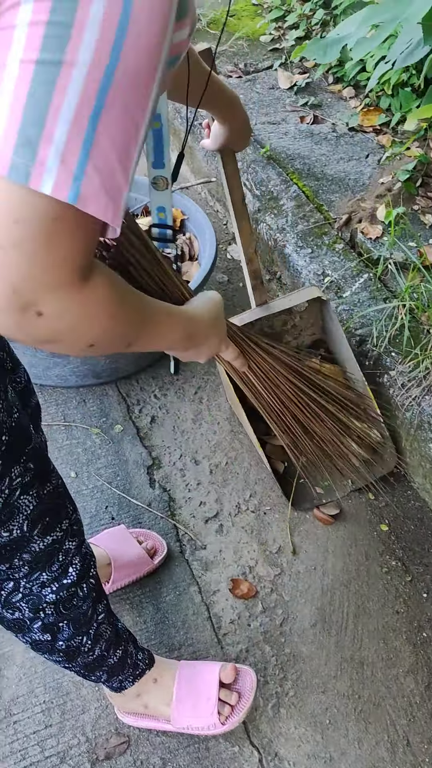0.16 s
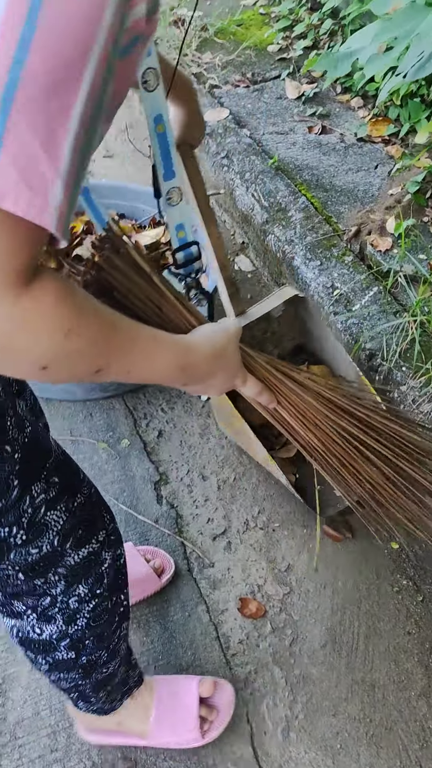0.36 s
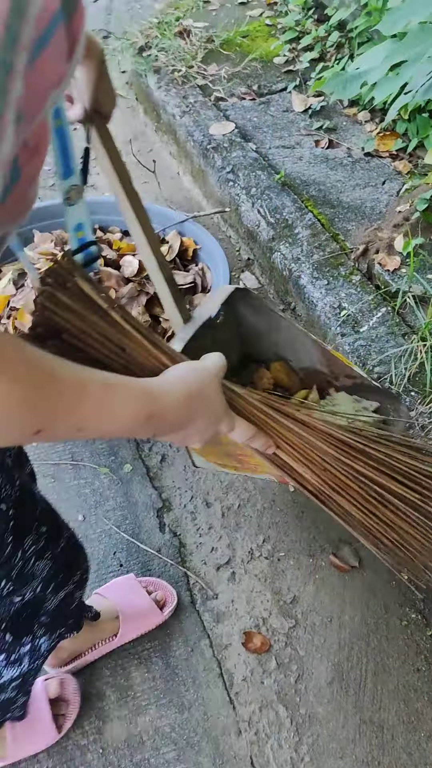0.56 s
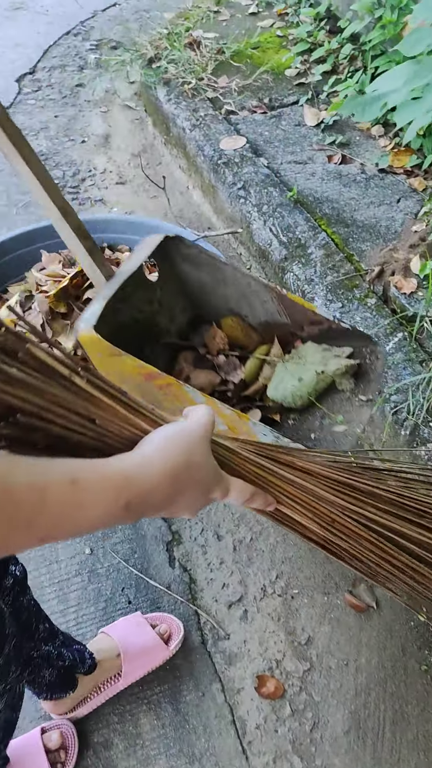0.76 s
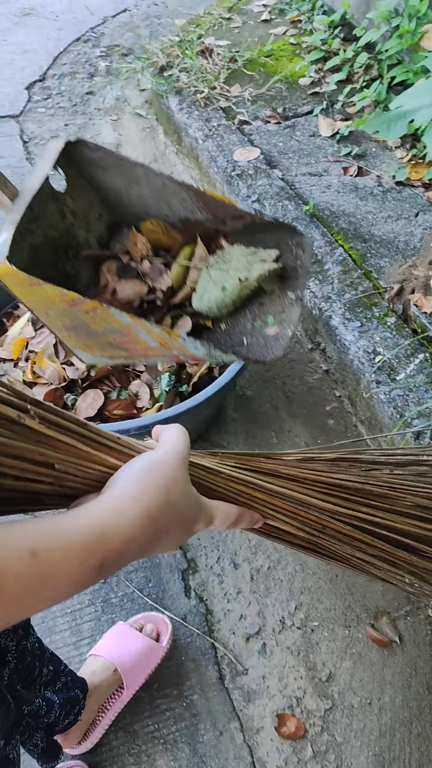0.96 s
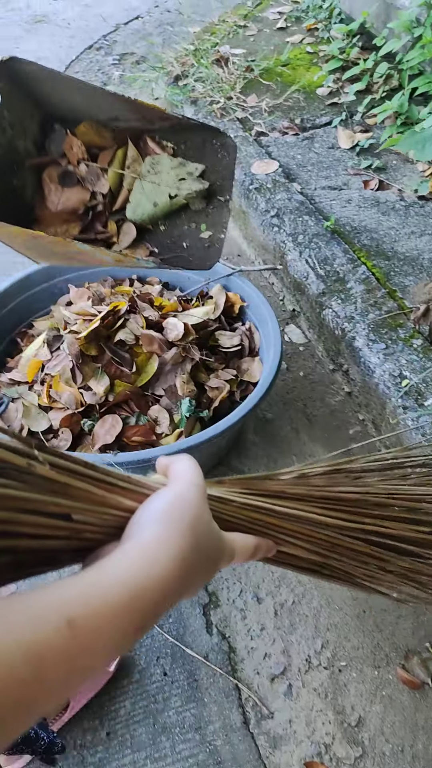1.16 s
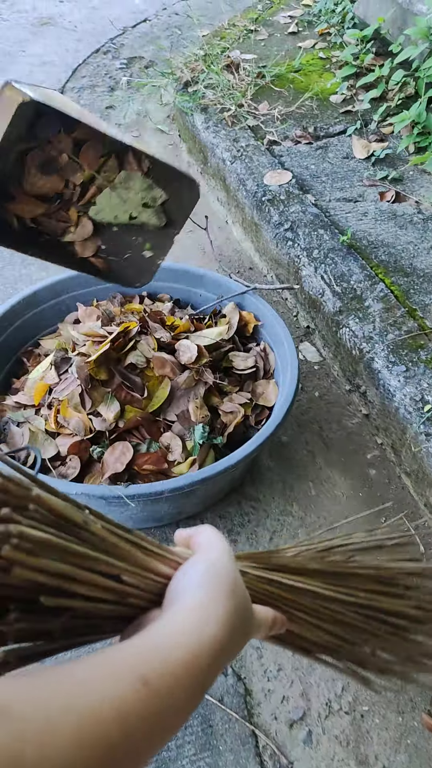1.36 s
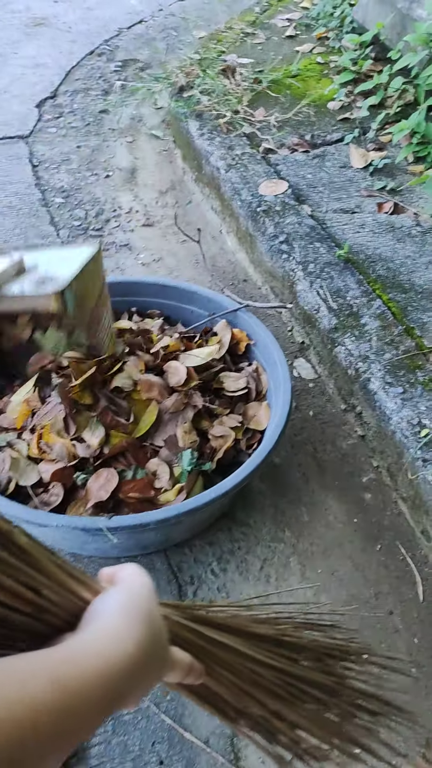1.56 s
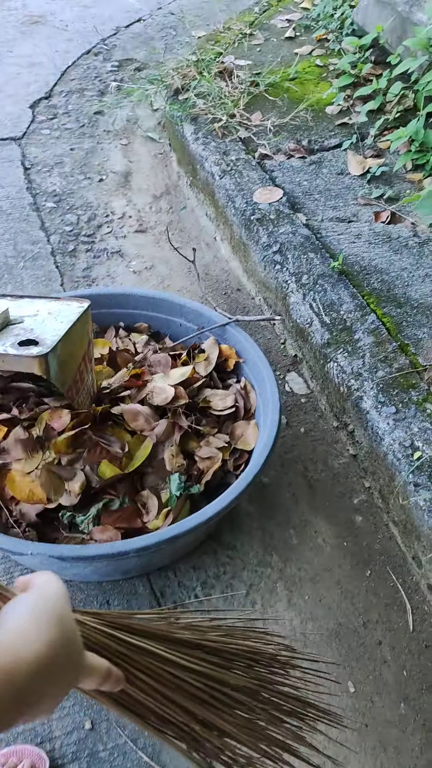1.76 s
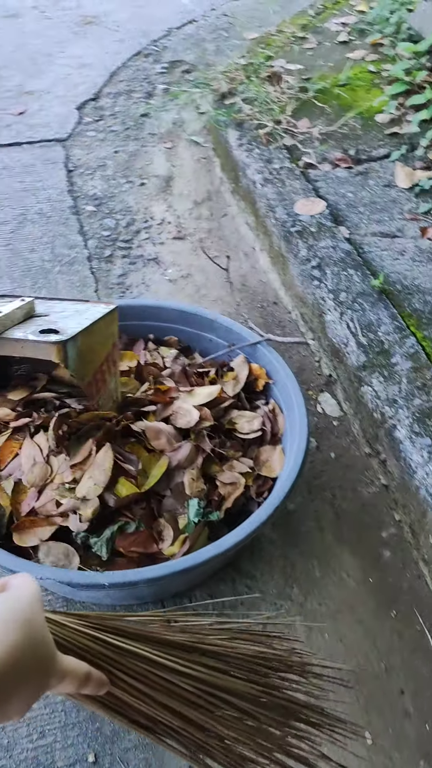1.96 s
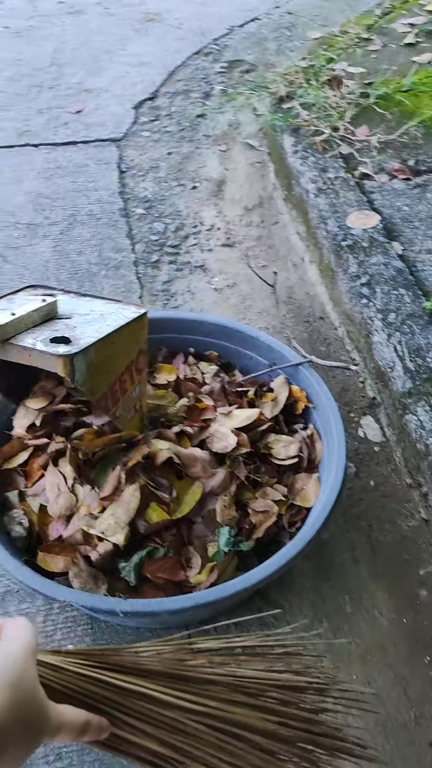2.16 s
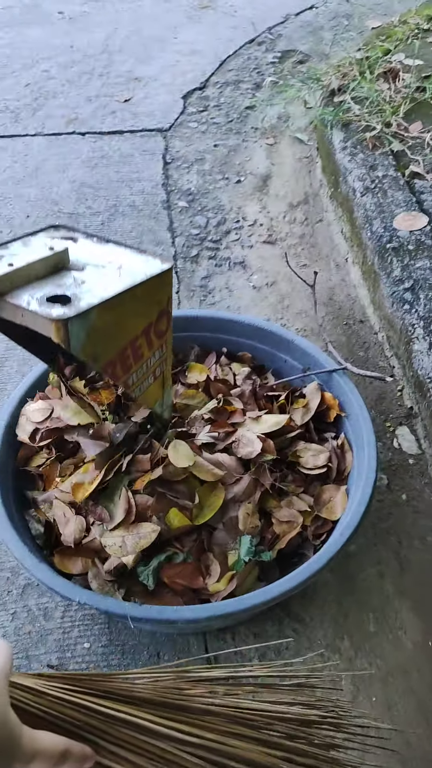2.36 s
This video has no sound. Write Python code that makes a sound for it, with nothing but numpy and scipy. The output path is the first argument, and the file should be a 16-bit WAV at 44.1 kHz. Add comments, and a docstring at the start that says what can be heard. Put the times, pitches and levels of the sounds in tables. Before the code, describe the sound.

A close dustpan thumps at about 0.25 seconds during a soft broom stroke, then gives a loud, briefly ringing clack at 0.35. Dry leaves tick inside and slide around 1.25. From 1.6 to 2 seconds they pour out, crackling and scraping, then the pan bumps a plastic basin and the leaves settle. Faint insects shrill over a low outdoor rumble throughout; a distant bird chirps near 0.9 and 1.3.

```python
"""A long-handled dustpan, close to the microphone on a concrete garden path, takes dry leaves from a
stick broom. It thumps, then clacks as it is lifted, each blow ringing its body. The leaves slide in
the pan and pour into a plastic basin in a crackle of tiny snaps; the pan bumps down on the basin.
Further off, insects shrill steadily in the plants and a far bird chirps twice over a low outdoor
rumble. In stereo, with the treble of the near sounds leaning to the right."""
import sys
import numpy as np
from scipy import signal
from scipy.fft import rfft, irfft
from scipy.io import wavfile
from scipy.ndimage import uniform_filter1d

SR = 44100
rng = np.random.default_rng(int(sys.argv[2]) if len(sys.argv) > 2 else 0)


def bounce(signal):
    """Save signal as a 16-bit WAV file at the path given by the first command-line argument."""
    frames = np.transpose(np.atleast_2d(signal))
    limited = np.clip(frames, -1, 1)
    pcm = np.round(limited * 32767).astype(np.int16)
    wavfile.write(sys.argv[1], SR, pcm)


N = 105840
BLOW_SAMPLES = 12288
T = np.arange(N) / SR
HZ = np.maximum(np.fft.rfftfreq(N, 1 / SR), 1)

# Blows and taps: start_s, level_db, brightness_hz
BROOM_THUMPS = [(0.2408, -18, 800), (0.2499, -22, 1200), (0.2585, -22, 1900), (0.2752, -25, 600),
                (0.2838, -30, 1400)]
HANDLE_CLACKS = [(0.3499, -9, 3400), (0.3566, -17, 2100), (0.3587, -15, 900)]
TWIG_TUMBLES = [(1.224, -38, 2500), (1.2525, -38, 2000), (1.268, -29, 3000), (1.279, -32, 3000),
                (1.314, -40, 2000)]
BASIN_BUMPS = [(2.034, -29, 1600), (2.041, -16.5, 950), (2.049, -18, 1250), (2.066, -26, 1200),
               (2.094, -29, 500), (2.111, -31, 400), (2.138, -28, 400), (2.168, -25, 450), (2.19, -32, 800),
               (2.217, -33, 500), (2.272, -38, 600)]
STALK_TICKS = [(0.069, -42, 12000), (0.430, -37, 4000), (0.5092, -32.5, 6000), (0.5258, -29.5, 3600),
               (1.015, -41, 4000), (1.224, -38.5, 7000), (1.388, -38, 3000), (2.088, -33, 11000)]
# Ringing modes of the pan and the basin: pitch_hz, gain_db, t60_s
PAN_FLOOR_MODES = [(152, -6, .07), (246, 3, .055), (333, -3, .04), (373, -10, .17), (439, -13, .13),
                   (533, -6, .07), (731, -13, .2), (932, -16, .05), (1849, -19, .07)]
PAN_WALL_MODES = [(205, -19, .3), (302, -18, .2), (367, -2, .09), (404, -4, .155), (498, -13, .21),
                  (626, -9, .14), (837, -6, .12), (936, -17, .16), (1011, -8, .07), (1163, -14, .13),
                  (1248, -19, .18), (1339, -11, .09), (1906, -8, .06), (2057, -13, .11), (2127, -9, .09),
                  (2321, 7, .008), (2466, -2, .06), (3202, -14, .04)]
PAN_BACK_MODES = [(1020, -3, .1), (1255, 0, .09), (1410, -1, .08), (1730, -10, .06), (2950, -6, .05)]
PAN_LIP_MODES = [(1850, -4, .04), (2300, -4, .025), (3050, -2, .03)]
BASIN_MODES = [(107, -20, .18), (190, -14, .1), (243, -2, .12), (283, -9, .09), (362, -10, .12),
               (422, -14, .12), (484, -7, .1), (545, -9, .09), (743, -14, .09), (845, -10, .12),
               (1044, -20, .12), (1233, -17, .12), (2073, -21, .088)]
# Short rubs of bristles, sandal and leaves: start_s, attack_s, hold_s, release_t60_s, level_db
BROOM_STROKE = (0, .004, .07, .8, -44.5)
BROOM_BRUSH = (0.6145, .002, .058, .2, -41.5)
SANDAL_SCUFF = (1.095, .012, .04, .2, -44)
LEAF_SLIDE = (1.25, .023, .033, .2, -35)
LIP_SCRAPE = (1.635, .04, .07, .42, -34)
LEAF_LANDING = (1.79, .04, .02, .25, -40)
LEAF_CRUNCH = (2.034, .008, .055, .12, -52)
LEAF_SETTLING = (1.99, .04, .36, .5, -47.5)
# Rise and fall of the shifting leaves, the pour and the distant air: time_s, gain_db
SHIFT_CURVE = [(0, -56), (0.45, -53), (0.58, -59), (0.82, -64), (1.0, -56), (1.2, -56), (1.45, -60),
               (2.4, -58)]
POUR_CURVE = [(1.55, -59), (1.616, -46), (1.682, -37), (1.77, -43), (1.812, -43), (1.824, -46), (2.0, -58)]
AIR_CURVE = [(0, -44.5), (0.7, -47), (1.4, -47), (2.4, -46)]
# Spectrum of each noisy sound: frequency_hz, gain_db
CLATTER_COLOUR = [(40, -40), (90, -25), (140, -7), (220, -4), (450, 0), (1000, -4.5), (1600, -8),
                  (2450, -.5), (3200, -7), (4200, -26), (8000, -30), (15000, -30)]
TICK_COLOUR = [(300, -16), (800, -11), (1300, -3), (1850, 2), (2400, -3), (3200, 1), (4000, -11),
               (9000, -8), (15000, -11)]
STROKE_COLOUR = [(300, -6), (1200, -6), (2000, 0), (3200, -1), (4200, -6), (8000, -6), (10000, -9),
                 (14000, -10)]
BRUSH_COLOUR = [(400, -10), (1200, -12), (1550, 1), (1800, 4), (2300, -3), (3200, -1), (3900, -15),
                (9000, -14), (14000, -19)]
SCUFF_COLOUR = [(150, -8), (450, 0), (650, -6), (880, -1), (1200, -14), (3000, -20), (9000, -42)]
SHIFT_COLOUR = [(400, -4), (1300, -1), (1900, 2), (3200, -1), (4500, -10), (7000, -12), (9000, -8),
                (12000, -13), (14000, -13)]
SLIDE_COLOUR = [(60, -25), (180, 0), (400, -8), (750, -8), (980, 2), (1150, -4), (1900, -1), (2400, -3),
                (3000, 0), (4000, -7), (9000, -13), (14000, -28)]
POUR_COLOUR = [(60, -10), (190, 3), (400, -1), (800, 0), (1500, -4), (2200, -3), (3000, -4), (3800, -4),
               (5000, -7.5), (8000, -6.5), (11000, -12), (14000, -13.5)]
SCRAPE_COLOUR = [(400, -20), (1550, -14), (1860, 5), (2020, -1), (2260, 3), (2550, 0), (2780, -5),
                 (3000, 3), (3300, -2), (4000, -18), (14000, -35)]
LANDING_COLOUR = [(80, -20), (175, 0), (280, -8), (600, -17), (2000, -35)]
CRUNCH_COLOUR = [(3000, -10), (5000, 0), (9000, 0), (14000, -10)]
SETTLING_COLOUR = [(200, -3), (600, 1), (1400, -2), (2400, 1), (3200, -1), (4200, -8), (6000, -12),
                   (8500, -12), (11000, -16), (14000, -17)]
AIR_COLOUR = [(15, -2), (26, 2), (37, -17), (54, -3), (70, -13), (120, -5), (190, -6), (300, -11),
              (500, -15), (800, -20), (1400, -24), (2500, -22), (3300, -24), (3900, -28), (4800, -29),
              (6000, -40), (8200, -42), (9500, -35), (11500, -44), (14500, -44)]
GARDEN_COLOUR = [(100, -3), (400, 0), (1000, -5), (2500, -4), (10000, -14)]
# Bird whistles, the first two overlapping as one chirp: start_s, length_s, start_hz, end_hz, level_db
BIRD_WHISTLES = [(0.868, .035, 5700, 5100, -49), (0.88, .06, 4700, 3700, -54),
                 (1.327, .036, 3200, 2950, -39)]
# Insect choruses: pitch_hz, width_hz, level_db, left_over_right_db
INSECT_BANDS = [(7020, 560, -56.5, -8), (5050, 850, -58.5, -4)]
# How alike the microphone's two sides are: frequency_hz, correlation
STEREO_LIKENESS = [(100, .995), (250, .96), (550, .7), (1100, .2), (2200, 0), (5000, -.05), (14000, 0)]
# Balance of near sounds at the microphone: frequency_hz, left_over_right_db
NEAR_BALANCE = [(100, 0), (220, .8), (380, 4), (600, 0), (1100, -1.5), (2100, 2), (3500, -3), (6000, -5),
                (8000, -10), (9500, -1), (11500, -3), (13500, -7)]


def dustpan():
    """Close up, the pan is thumped, clacks on its handle, rings as twigs tumble and bumps the basin."""
    thumps = struck(BROOM_THUMPS, PAN_FLOOR_MODES, lag_s=.00016,
                    clatter_db=-7, clatter_t60_s=.06, rattle_db=-24, rattle_t60_s=.27)
    clacks = struck(HANDLE_CLACKS, PAN_WALL_MODES, lag_s=.00012,
                    clatter_db=-5, clatter_t60_s=.06, rattle_db=-18, rattle_t60_s=.3)
    tumbles = struck(TWIG_TUMBLES, PAN_BACK_MODES, lag_s=.00036,
                     clatter_db=-10, clatter_t60_s=.04, rattle_db=-25, rattle_t60_s=.15)
    bumps = struck(BASIN_BUMPS, BASIN_MODES, lag_s=.0001,
                   clatter_db=-5.5, clatter_t60_s=.09, rattle_db=-20, rattle_t60_s=.3)
    return thumps + clacks + tumbles + bumps


def stalks():
    """Single dry stalks tap the pan, each a quickly dying crackle."""
    out = 0
    for tick in STALK_TICKS:
        snaps = crackle(per_s=12000, spread_db=1.5, size=BLOW_SAMPLES)
        out = out + contact(coloured(snaps, TICK_COLOUR) * decay(t60_s=.032), *tick)
    return out


def sweeping():
    """Bristles drag and brush; a sandal shifts on the path."""
    return (rub(BROOM_STROKE, STROKE_COLOUR, per_s=7000, spread_db=2.2)
            + rub(BROOM_BRUSH, BRUSH_COLOUR, per_s=12000, spread_db=1.2)
            + rub(SANDAL_SCUFF, SCUFF_COLOUR, per_s=1500, spread_db=2.5))


def leaves_in_pan():
    """Loose leaves shift in the carried pan, then slide along it."""
    level = from_db(curve(SHIFT_CURVE) + 3 * wobble(rate_hz=25))
    shifting = level * coloured(crackle(per_s=1500, spread_db=2), SHIFT_COLOUR)
    return shifting + rub(LEAF_SLIDE, SLIDE_COLOUR, per_s=12000, spread_db=1.6)


def leaves_pouring():
    """Leaves stream out in a dense crackle and scrape over the pan's lip."""
    fade_in = np.clip((T - POUR_CURVE[0][0]) / .03, 0, 1)
    fade_out = np.clip((POUR_CURVE[-1][0] - T) / .04 + 1, 0, 1)
    flow = from_db(curve(POUR_CURVE) + 5) * fade_in * fade_out
    stream = flow * coloured(crackle(per_s=9000, spread_db=1.9), POUR_COLOUR)
    return stream + rub(LIP_SCRAPE, SCRAPE_COLOUR, per_s=4000, spread_db=1.5, antiphase=.6)


def leaves_in_basin():
    """Leaves land softly on the heap, crunch under the pan and settle."""
    return (rub(LEAF_LANDING, LANDING_COLOUR, per_s=1500, spread_db=1.5)
            + rub(LEAF_CRUNCH, CRUNCH_COLOUR, per_s=4000, spread_db=1.5)
            + rub(LEAF_SETTLING, SETTLING_COLOUR, per_s=6000, spread_db=2.2))


def lip_snaps():
    """Stiff leaves catch on the lip one by one as they pour out, and set it ringing."""
    pouring = (T > POUR_CURVE[0][0]) * (T < POUR_CURVE[-1][0])
    snaps = crackle(per_s=130, spread_db=2) * from_db(curve(POUR_CURVE) - 2) * pouring
    return signal.fftconvolve(snaps, ringing(PAN_LIP_MODES, lag_s=0), axes=1)[:, :N]


def bird():
    """Short falling whistles off to the right, blurred by distance."""
    out = 0
    for start_s, length_s, start_hz, end_hz, level_db in BIRD_WHISTLES:
        progress = np.minimum(T[:BLOW_SAMPLES] / length_s, 1)
        blur = 1 + .025 * unit_rms(uniform_filter1d(hiss(BLOW_SAMPLES), size=50))
        pitch_hz = (start_hz + (end_hz - start_hz) * progress) * blur
        whistle = np.sin(2 * np.pi * np.cumsum(pitch_hz, axis=1) / SR)
        out = out + placed(from_db(level_db) * np.sin(np.pi * progress) * whistle, start_s)
    return out * panned(-4)


def insects():
    """Many wings in the plants blur into narrow, throbbing bands."""
    out = 0
    for pitch_hz, width_hz, level_db, balance_db in INSECT_BANDS:
        rolloff = np.sqrt(1 + (2 * (HZ - pitch_hz) / width_hz) ** 4)
        band = unit_rms(irfft(rfft(hiss()) / rolloff, N))
        out = out + band * from_db(level_db + 1.3 * wobble(rate_hz=40)) * panned(balance_db)
    return out


def garden_reflections(direct, level_db=-23):
    """Walls and plants return a faint, dull tail to the microphone."""
    onset = np.minimum(T[:BLOW_SAMPLES] / .015, 1)
    tail = coloured(hiss(BLOW_SAMPLES), GARDEN_COLOUR, near=False) * decay(t60_s=.42) * onset
    tail /= np.sqrt(np.sum(tail ** 2))
    return from_db(level_db) * signal.fftconvolve(direct, tail, axes=1)[:, :N]


def air():
    """Distant outdoor rumble and hiss."""
    return from_db(curve(AIR_CURVE)) * coloured(hiss(), AIR_COLOUR, near=False)


def struck(blows, modes, lag_s, clatter_db, clatter_t60_s, rattle_db, rattle_t60_s):
    """Every blow rings the body's modes and a quick clatter that ends in a faint rattle."""
    ring = ringing(modes, lag_s)
    envelope = from_db(clatter_db) * decay(clatter_t60_s) + from_db(rattle_db) * decay(rattle_t60_s)
    return sum(contact(ring + envelope * coloured(hiss(BLOW_SAMPLES), CLATTER_COLOUR), *blow)
               for blow in blows)


def ringing(modes, lag_s):
    """A body's modes after one blow, reaching the microphone's left side lag_s later."""
    t = np.maximum(T[:BLOW_SAMPLES] - np.array([[lag_s], [0]]), 0)
    out = 0
    for k, (pitch_hz, gain_db, t60_s) in enumerate(modes):
        gains = from_db(gain_db) * panned(curve(NEAR_BALANCE, pitch_hz))
        out = out + (-1) ** k * gains * np.sin(2 * np.pi * pitch_hz * t) * decay(t60_s)
    return out


def contact(sound, start_s, level_db, brightness_hz):
    """One blow; a soft contact dulls it."""
    lowpass = signal.butter(2, brightness_hz, fs=SR)
    return placed(from_db(level_db) * signal.lfilter(*lowpass, sound + 1e-18), start_s)


def rub(gesture, colour, per_s, spread_db, antiphase=0):
    """Friction: dense snaps under an attack, hold and release."""
    start_s, attack_s, hold_s, release_t60_s, level_db = gesture
    t = T[:2 * BLOW_SAMPLES]
    attack = np.minimum(t / attack_s, 1)
    release = from_db(-60 * np.maximum(t - attack_s - hold_s, 0) / release_t60_s)
    snaps = coloured(crackle(per_s, spread_db, len(t)), colour, antiphase=antiphase)
    return placed(from_db(level_db) * attack * release * snaps, start_s)


def crackle(per_s, spread_db, size=N):
    """Tiny snaps of uneven strength at random times."""
    strengths = from_db(spread_db * np.minimum(rng.exponential(1, size), 3))
    return hiss(size) * strengths * (rng.random(size) < per_s / SR)


def coloured(pair, colour, near=True, antiphase=0):
    """Two noises become stereo of one colour at rms 1, alike in the bass unless set in antiphase."""
    size = pair.shape[1]
    mid, side = rfft(pair)
    alike = np.clip(per_bin(STEREO_LIKENESS, size) * (1 - antiphase) - antiphase, -1, 1)
    stereo = np.sqrt(1 + alike) * mid + np.sqrt(1 - alike) * side * [[1], [-1]]
    balance = panned(per_bin(NEAR_BALANCE, size) * near)
    return unit_rms(irfft(stereo * from_db(per_bin(colour, size)) * balance, size))


def hiss(size=N):
    """Two white noises."""
    return rng.standard_normal((2, size))


def wobble(rate_hz):
    """Random drift at rms 1, mostly slower than rate_hz."""
    return unit_rms(irfft(rfft(rng.standard_normal(N)) / (1 + (HZ / rate_hz) ** 2), N))


def decay(t60_s):
    """A fall of 60 dB every t60_s."""
    return from_db(-60 * T[:BLOW_SAMPLES] / t60_s)


def placed(sound, start_s):
    """Put a short sound at its time."""
    return np.pad(sound, ((0, 0), (int(start_s * SR), N)))[:, :N]


def curve(points, at=T):
    """Read between a table's points, by default over time."""
    return np.interp(at, *np.transpose(points))


def per_bin(points, size):
    """Read a table at every frequency of a sound of that size."""
    hz, value = np.transpose(points)
    return np.interp(np.log(np.fft.rfftfreq(size, 1 / SR) + 1), np.log(hz), value)


def panned(left_over_right_db):
    """Left and right gains."""
    return from_db(np.array([[.5], [-.5]]) * left_over_right_db)


def from_db(db):
    """Decibels to gain."""
    return 10 ** (db / 20)


def unit_rms(x):
    """Scale to rms 1."""
    return x / np.sqrt(np.mean(x ** 2) + 1e-20)


def scene():
    """The work close to the microphone, the garden around it."""
    direct = (dustpan() + stalks() + sweeping() + leaves_in_pan() + leaves_pouring()
              + leaves_in_basin() + lip_snaps() + bird())
    return direct + garden_reflections(direct) + insects() + air()


def record(dry):
    """The recorder rounds the peaks and cuts the top at 14.5 kHz."""
    rounded = 1.2 * np.tanh(dry / 1.2)
    return irfft(rfft(rounded) * np.clip((14500 - HZ) / 200, 0, 1), N)


dry = scene()
out = record(dry)
bounce(out)
```